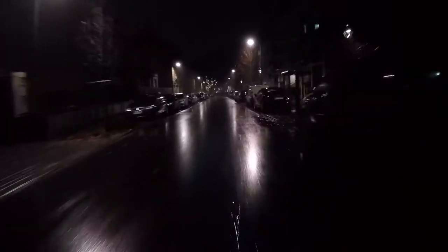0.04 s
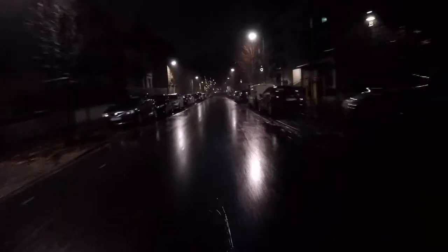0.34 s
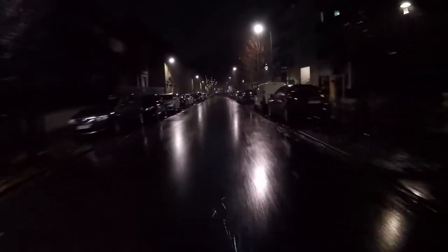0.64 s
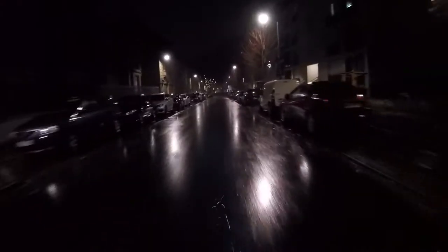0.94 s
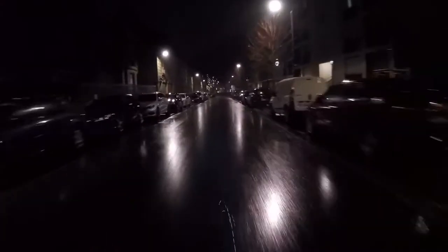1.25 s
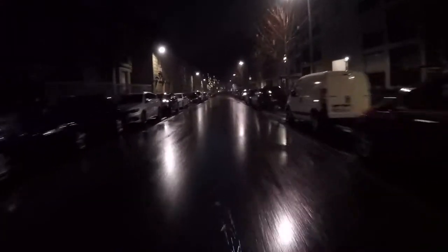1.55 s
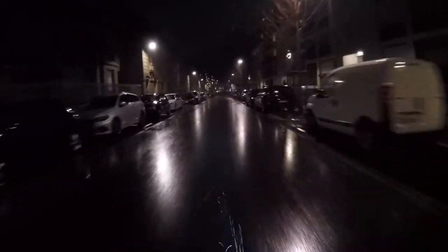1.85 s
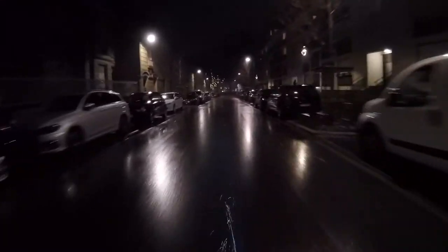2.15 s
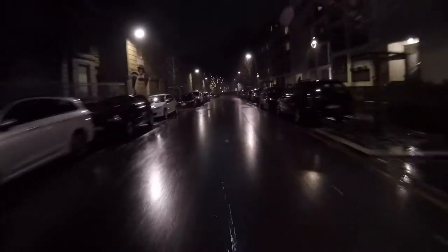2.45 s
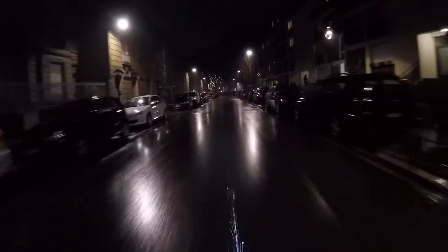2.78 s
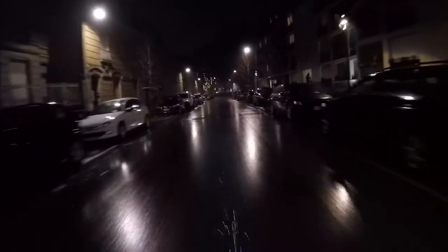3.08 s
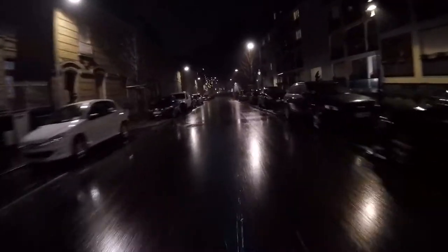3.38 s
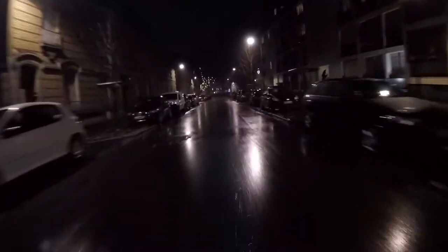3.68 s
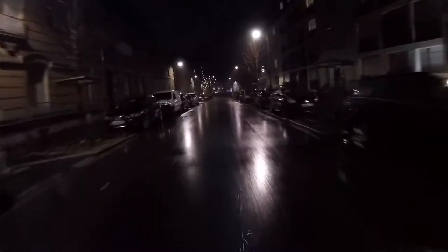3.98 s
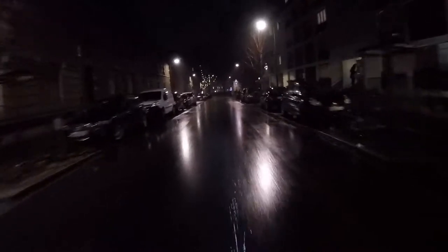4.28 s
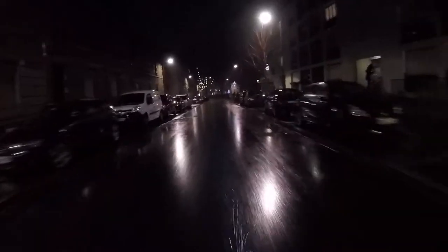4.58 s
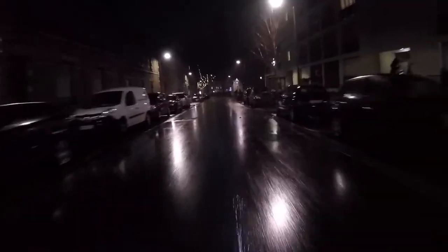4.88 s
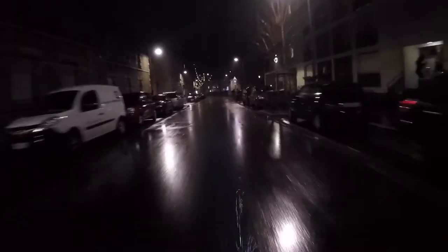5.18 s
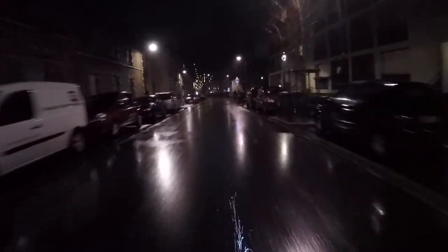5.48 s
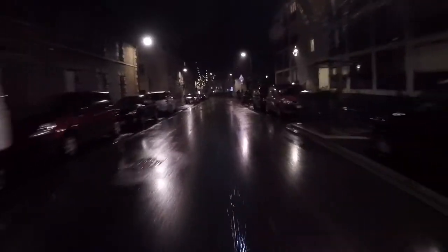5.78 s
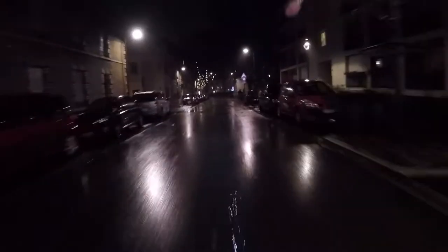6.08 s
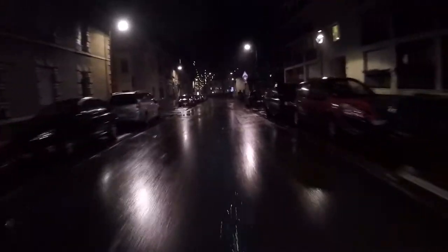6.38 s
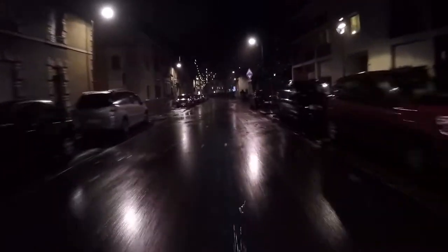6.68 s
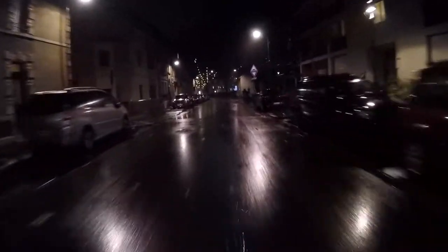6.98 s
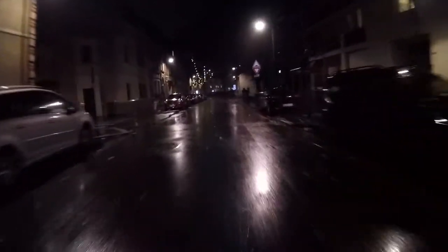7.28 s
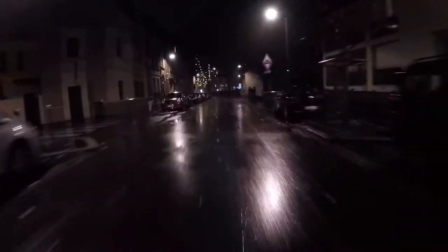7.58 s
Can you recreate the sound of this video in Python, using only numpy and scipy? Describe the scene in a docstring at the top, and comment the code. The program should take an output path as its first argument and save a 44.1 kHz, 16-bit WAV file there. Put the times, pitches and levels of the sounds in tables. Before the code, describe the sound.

Close wind rumble and the low hum of bicycle tyres on wet asphalt run throughout, picked up by a microphone on the shaking handlebar. The hum eases as a damp brake begins to rub, making a thin, ringing hiss that lasts to the end. Grit clicks lightly and irregularly, and water drops hit the microphone housing, mostly as small taps, then as a few sharp knocks shortly before the end.

```python
"""Bicycle on a wet street at night

Heard from a camera on the handlebar. Wind buffets the microphone, the tyres roar and spray,
the road shakes frame, fork and mount, and the tread hums. About halfway, the wet disc brake
starts to hiss by friction. Grit ticks under the tyres, then in the brake.
Thrown drops tap the camera case."""
import sys
import numpy as np
from scipy import signal
from scipy.fft import rfft, irfft
from scipy.io import wavfile
from scipy.ndimage import uniform_filter1d, minimum_filter1d

SR = 44100
rng = np.random.default_rng(int(sys.argv[2]) if len(sys.argv) > 2 else 0)


def output_pcm(signal):
    """Save a mono or channel-first signal as 16-bit PCM at the path in sys.argv[1].

    Samples are clipped to [-1, 1] before scaling.
    """
    pcm = np.clip(np.atleast_2d(signal).T, -1, 1) * 32767
    wavfile.write(sys.argv[1], SR, np.round(pcm).astype(np.int16))


N = 341334

# Spectra: f/Hz, level/dB
WIND_SPECTRUM = [(4, -21), (14, -3.5), (28, 3.5), (55, -0.5), (90, -4), (120, -3.5), (180, -13.5),
                 (400, -26), (900, -72.5), (4000, -110)]
ROAR_SPECTRUM = [(200, -4.5), (600, 2), (780, 4.5), (870, -4), (940, 0), (1150, -5), (1550, -10),
                 (1800, -20.5), (2100, -22), (2600, -33), (4000, -45), (9000, -64), (16000, -75.5)]
SPRAY_SPECTRUM = [(1500, -7.5), (3000, -2), (4600, -8), (5400, -0.5), (6400, 2), (8000, -3.5), (10000, -9),
                  (13000, -14), (16000, -18)]
SPLASH_SPECTRUM = [(1000, -20), (3800, -1.5), (4950, 5), (5700, -6.5), (6500, 1), (7400, -5), (8500, 0),
                   (9800, -16.5), (12000, -27), (16000, -36)]
TICK_SPECTRUM = [(2000, -50), (3900, -30), (4500, -8.5), (5000, 3.5), (5900, -10.5), (6700, -6.5),
                 (8000, -15.5), (8700, -10), (10500, -23), (12000, -36.5), (16000, -44)]
SCRAPE_SPECTRUM = [(600, -10), (1500, 6), (2400, 2), (3100, -2.5), (4000, -6), (5900, -6.5), (6450, 3),
                   (7500, -3), (8550, 4), (9100, -5), (9700, -16), (11000, -18.5), (12400, -19.5),
                   (14000, -26), (15500, -32.5)]

# Resonances: f/Hz, width/Hz, level/dB
FRAME_MODES = [(137.7, 31, 2), (153, 41, -2.5), (193.5, 30, -6.5)]
FORK_MODES = [(211.3, 40, -2), (238.6, 22, 0), (270.3, 17, 1), (298.7, 12, -5), (321, 26, -10),
              (369.6, 33, -10)]
MOUNT_MODES = [(443, 40, -2.5), (478.6, 56, -5), (521, 30, 1), (551.4, 26, 1), (576, 15, 1.5),
               (599, 30, -10), (655.5, 43, -8), (721.6, 95, -14.5), (833, 16, -22.5), (923, 34, -23),
               (950, 30, -25.5)]
HISS_RING_MODES = [(4910, 420, 2.5), (5130, 450, -1.5)]
BRAKE_DRONE_MODES = [(386, 16, 1.5), (577, 11, 1.5), (657, 14, 0.5), (695, 60, -6.5)]

# Envelopes: t/s, relative level/dB
ROAD_SHAKE = [(0, 0), (2.2, 0), (3.2, 0.8), (3.65, -7.5), (3.9, -5.5), (4.75, -1.5), (5.2, -3.5), (6.5, -3),
              (7.0, -5.5), (7.74, -6)]
ROAD_WETNESS = [(0, 0), (0.5, 1), (0.95, 0), (1.12, -4), (1.35, -1.5), (1.72, -1.5), (1.87, 1.5),
                (2.25, -3), (2.48, 1.5), (2.7, -3), (2.9, -0.5), (3.25, -4.5), (7.74, -2)]
BRAKE_HISS_LEVEL = [(3.25, -16), (3.4, -13), (3.6, -10), (3.95, -6), (4.35, -0.5), (5.0, -1), (5.3, -1),
                    (5.55, -2), (6.55, 0), (6.78, -4), (6.85, -12), (6.97, -5.5), (7.25, 1), (7.31, -6.5),
                    (7.74, -2.5)]  # dips briefly after the loud knocks

# Rate of tread blocks meeting the road: t/s, f/Hz
TREAD_RATE = [(0, 96), (1.3, 98.3), (2.6, 95.8), (3.5, 99.7), (4.3, 101.4), (5.3, 103), (6.2, 99.2),
              (7.0, 102.4), (7.74, 98)]
# Tread harmonics 1-3: relative level/dB
TREAD_HARMONICS = [-7.5, 0, -22.5]
# Camera case modes: f/Hz, level/dB, t60/s
CASE_MODES = [(760, 4.5, 0.0035), (1220, 11, 0.0024), (1880, 5.5, 0.0031), (2380, 4, 0.0023),
              (3050, -9.5, 0.0026)]
# Drops: t/s, tap/dB, splash/dB, thud/dB, pitch factor, t60 factor, hardness/(dB per mode), splash f/Hz
DROP_HITS = [(0.169, -15.5, -58, -6, 0.88, 1.4, -3.5, 6000), (3.995, -12, -17, -22, 0.95, 1.1, 0.5, 8000),
             (4.2556, -30, -41, -41, 1.2, 1, 0, 6500), (5.3052, -17.5, -39, -27, 0.91, 3.2, -0.5, 6500),
             (5.3379, -14.5, -22, -15, 1, 0.77, 0.5, 4500), (5.5222, -27.5, -36, -34, 1.5, 1, 2, 6500),
             (6.2493, -19.5, -20.5, -28, 1.36, 0.92, 0, 5500),
             (6.5850, -15, -14.5, -18, 1.17, 0.9, 2, 5000), (6.8090, 3.5, 0, -1.5, 0.92, 1.2, -1, 10000),
             (6.8120, -3, -16, 5, 0.85, 1.4, 1, 5500), (6.8453, 2.5, -5.5, -17, 1.13, 1.3, 1, 10500),
             (6.8476, -9, -27, -27, 1.25, 1.3, 5, 8500), (6.8640, -23, -32, -29, 1.4, 1, -2, 8000),
             (7.5069, -24, -28, -38, 1.4, 1, -2, 5000)]
# Coarse grains: t/s, relative peak/dB, f/Hz, width/Hz
GRIT_TICKS = [(0.968, -41, 6500, 2500), (1.351, -44, 6000, 5000), (1.536, -43, 7200, 1800),
              (1.862, -41, 7000, 3500), (2.861, -43.5, 6800, 3500), (3.4123, -48, 5130, 905),
              (3.8394, -29, 6030, 4000), (4.041, -27, 8300, 2500), (4.1323, -27, 4550, 600),
              (4.2805, -36, 5200, 2500), (4.655, -33, 5300, 2500), (4.7887, -26, 4500, 2500),
              (4.887, -14.5, 5900, 4000), (4.966, -31, 4800, 3000), (5.212, -29, 5800, 3500),
              (5.2450, -28.5, 6400, 3500), (5.273, -30, 5030, 1500), (5.302, -29, 5600, 3500),
              (5.3848, -23, 6000, 3500), (5.4343, -34, 8400, 900), (5.48, -36, 5200, 1500),
              (5.914, -31, 5600, 4000), (5.9652, -24, 6200, 3000), (5.988, -32, 5500, 2500),
              (6.0204, -31, 4800, 1500), (6.2375, -33, 5200, 2000), (6.324, -30.5, 6900, 1500),
              (6.4582, -25.5, 6200, 3500), (6.493, -34, 7600, 2200), (6.531, -31, 5600, 2500),
              (6.5717, -27, 5800, 3500), (6.6000, -29, 5800, 3000), (6.7347, -33, 6000, 4000),
              (6.7800, -28, 6000, 4000), (6.9544, -29.5, 6000, 3000), (7.1550, -18.5, 5860, 3000),
              (7.177, -29, 8300, 1800), (7.2317, -34, 5200, 2000), (7.244, -28, 6500, 5000),
              (7.256, -29, 4970, 900)]

BRAKE_ON_S, RING_RISE_S, SCRAPE_RISE_S = 3.22, 0.12, 0.5


def amp(db):
    """dB to gain."""
    return 10 ** (np.asarray(db) / 20)


def unit(x):
    """Scale to rms 1."""
    return x / np.sqrt(np.mean(x ** 2) + 1e-20)


def peaked(x):
    """Scale to peak 1."""
    return x / np.abs(x).max()


def curve(rows):
    """(t/s, value) rows at every sample."""
    return np.interp(np.arange(N) / SR, *np.transpose(rows))


def ramp(start_s, length_s):
    """Linear 0 to 1, then held."""
    return np.clip((np.arange(N) / SR - start_s) / length_s, 0, 1)


def add(mix, start_s, sound):
    """Mix in at start_s."""
    part = mix[round(start_s * SR):][:len(sound)]
    part += sound[:len(part)]


def colour(x, spectrum):
    """Filter by (f/Hz, level/dB) points."""
    hz, db = np.transpose(spectrum)
    f_hz = np.fft.rfftfreq(len(x), 1 / SR)
    gain_db = np.interp(np.log(f_hz + 1), np.log(hz), db)
    return irfft(rfft(x) * amp(gain_db), len(x))


def resonate(x, modes):
    """Filter by steep resonances; powers add."""
    f_hz = np.fft.rfftfreq(len(x), 1 / SR)
    power = sum(amp(db) ** 2 / (1 + (2 * (f_hz - hz) / width_hz) ** 2) ** 2
                for hz, width_hz, db in modes)
    return irfft(rfft(x) * np.sqrt(power), len(x))


def noise():
    """White noise."""
    return rng.standard_normal(N)


def wander(rate_hz):
    """Random drift up to about rate_hz, rms 1."""
    f_hz = np.fft.rfftfreq(N, 1 / SR)
    return unit(irfft(rfft(noise()) * np.exp(-(f_hz / rate_hz) ** 2), N))


def crackle(per_s, decay_s, spread_db=4.5):
    """Tiny random bursts: many faint, few strong."""
    size = amp(spread_db * np.minimum(rng.exponential(1, N), 4))
    hits = size * (rng.random(N) < per_s / SR)
    power = signal.lfilter([1], [1, -np.exp(-1 / (decay_s * SR))], hits ** 2)
    return unit(np.sqrt(power) * noise())


def burst(decay_s):
    """Whitened spatter, onset at mid-buffer."""
    t = np.arange(1024) / SR
    fade = np.concatenate([np.zeros(len(t)), np.exp(-t / decay_s)])
    spectrum = rfft(fade * rng.standard_normal(len(fade)))
    return irfft(spectrum / np.abs(spectrum)) * np.sqrt(fade)


def steadied(x, window_s):
    """Even out lulls and surges."""
    size = int(window_s * SR)
    power = uniform_filter1d(uniform_filter1d(x ** 2, size), size)
    return unit(x / (power + 1e-9) ** 0.25)


def wind(base_db=-19, rise_db=5, gust_db=0.15):
    """Low turbulence at the microphone port; the headwind freshens halfway."""
    level_db = base_db + rise_db * ramp(start_s=4.1, length_s=0.9) + gust_db * wander(rate_hz=1.6)
    return steadied(colour(noise(), WIND_SPECTRUM), window_s=0.057) * amp(level_db)


def tyre_roar(base_db=-35, shake_follow=0.84, braking_db=4, flutter_db=0.98):
    """Dull roar of the wet road, raised by braking."""
    roar = unit(colour(noise(), ROAR_SPECTRUM))
    load_db = shake_follow * curve(ROAD_SHAKE) + braking_db * ramp(BRAKE_ON_S, length_s=0.64)
    return roar * amp(base_db + load_db + flutter_db * wander(rate_hz=27))


def tyre_spray(base_db=-60, droplets_db=-5, patchy_db=1.1):
    """Fizz of fine droplets, swelling on wetter patches."""
    fizz = noise() + amp(droplets_db) * crackle(per_s=200, decay_s=0.0004)
    wetness_db = curve(ROAD_WETNESS) + patchy_db * wander(rate_hz=25)
    return unit(colour(fizz, SPRAY_SPECTRUM)) * amp(base_db + wetness_db)


def frame_rattle(frame_db=-15, fork_db=-17, mount_db=-20.5, braking_db=2):
    """Rough asphalt shakes frame, fork and camera mount; braking loads the frame."""
    load_db = braking_db * amp(curve(BRAKE_HISS_LEVEL)) * ramp(BRAKE_ON_S, SCRAPE_RISE_S)
    shake_db = curve(ROAD_SHAKE)
    frame = unit(resonate(noise(), FRAME_MODES)) * amp(frame_db + 0.75 * shake_db + load_db)
    fork = unit(resonate(noise(), FORK_MODES)) * amp(fork_db + 1.41 * shake_db)
    mount = unit(resonate(noise(), MOUNT_MODES)) * amp(mount_db + 0.9 * shake_db)
    return frame + fork + mount


def tread_hum(base_db=-11.5, shake_follow=0.67, skip_db=6, braking_db=-5.5, drift=0.018):
    """Tread blocks strike near 100 Hz; the hum dips as the tyre skips and falls as braking begins."""
    rate_hz = curve(TREAD_RATE) * (1 + drift * wander(rate_hz=15.7))
    cycles = np.cumsum(rate_hz) / SR
    hum = np.zeros(N)
    for k, db in enumerate(TREAD_HARMONICS, 1):
        dip_db = skip_db * np.maximum(wander(rate_hz=18), 0) ** 2
        hum += amp(db - dip_db) * np.sin(2 * np.pi * (k * cycles + rng.random()))
    fall_db = braking_db * ramp(start_s=3.44, length_s=0.32)
    return np.sqrt(2) * hum * amp(base_db + shake_follow * curve(ROAD_SHAKE) + fall_db)


def drops(thud_hz=410, thud_s=0.0017, flatten_s=0.00024, splash_width_hz=9000):
    """Each drop pushes the case, rings its modes and splashes; hard hits favour upper modes."""
    out = np.zeros(N)
    t = np.arange(1024) / SR
    thud = peaked(np.sin(2 * np.pi * thud_hz * t) * t * np.exp(-2 * t / thud_s))
    soft_onset = 1 - np.exp(-(t / flatten_s) ** 2)
    for at_s, tap_db, splash_db, thud_db, pitch, t60_factor, hardness_db, splash_hz in DROP_HITS:
        tap = np.zeros(len(t))
        for k, (hz, db, t60_s) in enumerate(CASE_MODES):
            mode_db = db + k * hardness_db - 60 * t / (t60_s * t60_factor)
            tap += (-1) ** k * amp(mode_db) * np.sin(2 * np.pi * hz * pitch * t)
        spatter = colour(burst(decay_s=0.00091), SPLASH_SPECTRUM)
        splash = resonate(spatter, [(splash_hz, splash_width_hz, 0)])
        add(out, at_s, amp(tap_db) * peaked(tap * soft_onset) + amp(thud_db) * thud)
        add(out, at_s - len(splash) / 2 / SR, amp(splash_db) * peaked(splash))
    return out


def coarse_grit(gain_db=-1):
    """One bright tick per grain, under the tyres, then in the brake; narrow bands ping."""
    out = np.zeros(N)
    for at_s, db, hz, width_hz in GRIT_TICKS:
        click = colour(burst(decay_s=0.00098), TICK_SPECTRUM)
        tick = resonate(click, [(hz, width_hz, 0)])
        add(out, at_s - len(tick) / 2 / SR, amp(db + gain_db) * peaked(tick))
    return out


def fine_grit(low_hz=2500, high_hz=9500, width_hz=1800, bands=7):
    """Tiny ticks between pad and disc, in evenly spaced bands."""
    return unit(sum(resonate(crackle(per_s=220, decay_s=0.00078), [(hz, width_hz, 0)])
                    for hz in np.linspace(low_hz, high_hz, bands)))


def disc_brake(scrape_db=-48.5, ring_db=-51, drone_db=-32, grit_db=-6, flutter_db=1.26):
    """Gritty friction of wet pads: broad scrape, low drone. A ring near 5 kHz in the hiss leads."""
    friction = noise() + amp(grit_db) * fine_grit()
    friction *= amp(flutter_db * wander(rate_hz=38))
    hiss_db = curve(BRAKE_HISS_LEVEL)
    scrape = unit(colour(friction, SCRAPE_SPECTRUM)) * amp(scrape_db + hiss_db)
    ring = unit(resonate(friction, HISS_RING_MODES)) * amp(ring_db + hiss_db)
    drone = unit(resonate(friction, BRAKE_DRONE_MODES)) * amp(drone_db)
    return ramp(BRAKE_ON_S, RING_RISE_S) * ring + ramp(BRAKE_ON_S, SCRAPE_RISE_S) * (scrape + drone)


def scene():
    """Close sources, open street, mono."""
    riding = tread_hum() + frame_rattle() + wind() + tyre_roar() + tyre_spray()
    return (riding + disc_brake() + coarse_grit() + drops())[None]


def record(dry, ceiling=0.84, knee_db=-4, hold_s=0.0072, cutoff_hz=15850):
    """Soft look-ahead limiter, then low-pass."""
    size = int(hold_s * SR)
    peak = np.abs(dry) + 1e-9
    knee = amp(knee_db)
    headroom = ceiling - knee
    allowed = np.minimum(peak, knee) + headroom * np.tanh(np.maximum(peak - knee, 0) / headroom)
    gain = minimum_filter1d(allowed / peak, 2 * size)
    limited = dry * uniform_filter1d(uniform_filter1d(gain, size), size)
    lowpass = signal.firwin(511, cutoff_hz, window=("kaiser", 9), fs=SR)
    return signal.oaconvolve(limited, lowpass[None], "same")


dry = scene()
out = record(dry)
output_pcm(out)
```